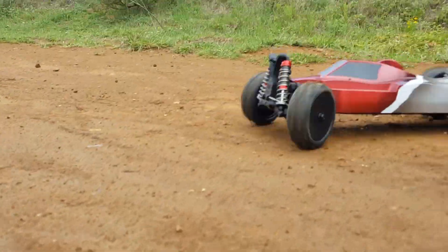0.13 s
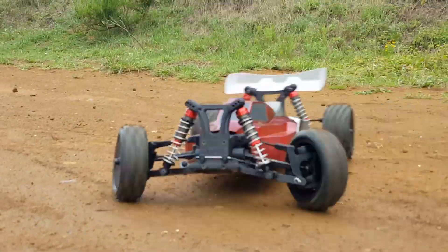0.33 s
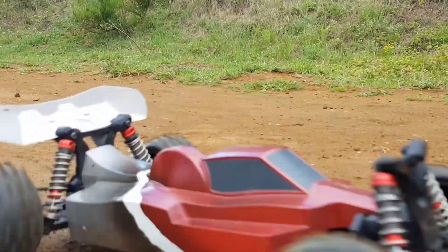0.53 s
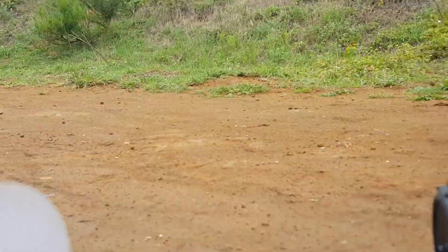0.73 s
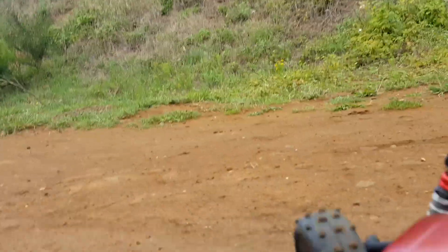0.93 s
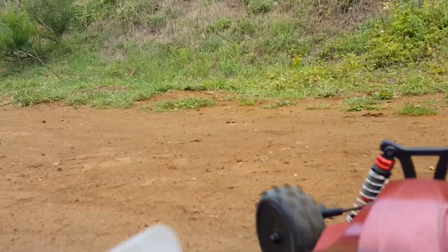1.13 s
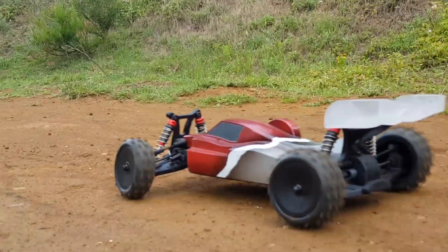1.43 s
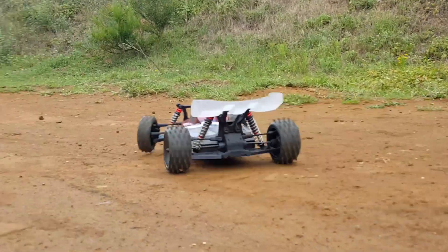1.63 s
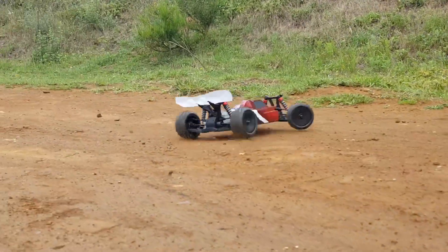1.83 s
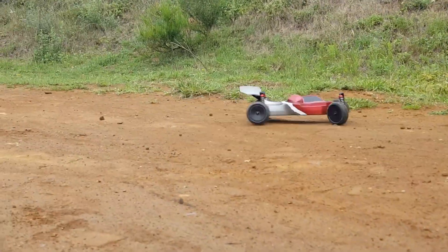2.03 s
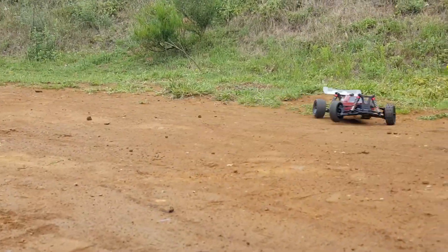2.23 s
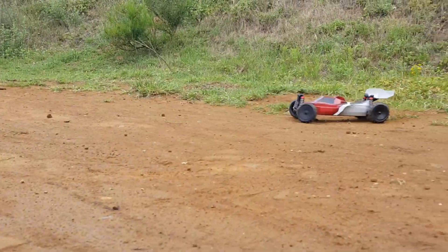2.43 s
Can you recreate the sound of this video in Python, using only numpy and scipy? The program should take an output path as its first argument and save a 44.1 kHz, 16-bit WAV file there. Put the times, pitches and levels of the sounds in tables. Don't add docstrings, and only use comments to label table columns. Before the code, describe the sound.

Outdoors on dirt, a toy buggy passes very close with rough gear whine, tyre hiss and ticking stones, halts with hard clacks, then pulls away buzzing and grows quieter over light wind rumble and faint hum.

```python
import sys
import numpy as np
from scipy import signal
from scipy.fft import rfft, irfft, next_fast_len
from scipy.io import wavfile
from scipy.ndimage import map_coordinates

SR = 44100
rng = np.random.default_rng(int(sys.argv[2]) if len(sys.argv) > 2 else 0)


def wav_out(sig):
    wavfile.write(sys.argv[1], SR, np.round(np.clip(np.atleast_2d(sig).T, -1, 1) * 32767).astype(np.int16))


def gain_from_decibels(decibels):
    exponent = np.asarray(decibels, float) / 20
    return 10 ** exponent


N = 114660


def unit(x):
    return x / np.sqrt(np.mean(np.abs(x) ** 2) + 1e-20)


def along(points, hz):
    f, v = np.transpose(points)
    return np.interp(np.log(hz + 1), np.log(f + 1), v)


def curves(rows):
    s, *columns = np.transpose(rows)
    return [np.interp(np.arange(N) / SR, s, column) for column in columns]


def wobble(rate):
    return map_coordinates(rng.standard_normal(N // 20), [np.arange(N) * rate / SR])


def noise(*ports):
    return rng.standard_normal((*ports, N))


def filtered(x, response):
    m = next_fast_len(N + 8192)
    return irfft(rfft(x, m) * response(np.fft.rfftfreq(m, 1 / SR)), m)[..., :N]


def between(start, end, edge_s):
    t = np.arange(N) / SR
    return np.clip((t - start) / edge_s, 0, 1) * np.clip((end - t) / edge_s, 0, 1)


def pings(rows, hz, gain_db, rise_s, t60, noisy):
    s, db = np.transpose(rows)[:2]
    t = np.arange(3000) / SR
    shape = (1 - np.exp(-t / rise_s)) * gain_from_decibels(-60 * t / t60)
    tone = np.sin(2 * np.pi * np.reshape(hz, (-1, 1)) * t)
    crack = noisy * rng.standard_normal((len(s), len(t)))
    wave = shape / shape.max() * (tone + crack) * gain_from_decibels(db + gain_db)[:, None]
    at = np.round(s * SR).astype(int)[:, None] + np.arange(len(t))
    return np.bincount(at.ravel(), wave.ravel(), N + SR)[:N]


def fuzzy(hz, width_hz):
    blur = wobble(width_hz) + 1j * wobble(width_hz)
    return unit(np.real(blur * np.exp(2j * np.pi * np.cumsum(hz) / SR)))


def tones(rows, edge_s, unsteady_db):
    t = np.arange(N) / SR
    total = 0
    for hz, db, start, end in rows:
        level = gain_from_decibels(db + 2.5 + unsteady_db * wobble(15.16))
        total = total + level * between(start, end, edge_s) * np.sin(2 * np.pi * hz * t)
    return total


def noise_floor():
    return gain_from_decibels(-55.5) * unit(filtered(noise(2), lambda f: 1 / (1 + (f / 450) ** 2)))


def far_hum():
    # (frequency [Hz], level [dB rms], start [s], end [s])
    hum_lines = [(90.5, -52, 1.3, 2.7), (181, -45, -.1, 2.32)]
    return tones(hum_lines, edge_s=0.083, unsteady_db=.5)


def wind():
    # (time [s], level [dB])
    strength = [(0, -40), (.15, -34.5), (.75, -34.5), (.95, -27), (1.1, -35), (1.3, -39.5), (1.8, -36),
                (2.6, -52)]
    # (frequency [Hz], density [dB per Hz])
    colour = [(15, -35), (30, -15), (60, 5), (100, -0.5), (150, -9.5), (300, -19), (700, -55.5)]
    wind_db, = curves(strength)
    return gain_from_decibels(wind_db) * unit(filtered(noise(2), lambda f: gain_from_decibels(along(colour, f))))


def ground_thumps():
    # (time [s], peak [dB], frequency [Hz], left over right [dB])
    bumps = [
        (0.072, -24, 62.6, 16),
        (0.857, -15, 67, 2),
        (0.917, -23, 87, 14),
        (0.983, -21, 67, 9),
        (1.453, -28, 56.3, 20),
        (1.677, -27, 57, 12),
        (1.782, -26, 57, 4),
        (1.948, -30.5, 89, 7),
    ]
    s, db, hz, pan_db = np.transpose(bumps)
    return np.array([pings(np.c_[s, db + side * pan_db], hz, 0, rise_s=0.0032, t60=0.12, noisy=0)
                     for side in (0, -1)])


def speed_controller():
    # (frequency [Hz], level [dB rms], start [s], end [s])
    whistles = [(5800, -66, .97, 1.07), (11600, -68, .99, 1.045), (7800, -70, .94, 1.0),
                (3750, -66, .93, 1.03)]
    return tones(whistles, edge_s=.015, unsteady_db=1.5)


def tyre_spray():
    # (time [s], level [dB])
    skid = [(0, -32), (.06, -51), (.18, -34.5), (.42, -37.5), (.55, -32), (.72, -32), (.8, -42.5),
            (.86, -37.5), (.95, -62), (1.033, -70), (1.041, -35.5), (1.07, -50), (1.13, -30.5), (1.27, -38),
            (1.5, -49.5), (1.62, -48), (1.79, -39.5), (1.98, -44), (2.06, -55), (2.12, -44.5), (2.27, -42),
            (2.6, -45)]
    # (frequency [Hz], density [dB per Hz])
    colour = [(1500, -28), (2500, 1), (3900, 6.5), (6000, 1.5), (8000, -7.5), (10000, -10), (12000, -5),
              (15500, -14.5)]
    spray_db, = curves(skid)
    fine = lambda f: f ** 4 / (f ** 4 + 5500 ** 4)
    hiss = noise() * gain_from_decibels(1.6 * wobble(300) + 2.4 * wobble(30))
    clumps_db = np.minimum(2.6 * wobble(22) + wobble(7), 3)
    grit = noise() * gain_from_decibels(1.5 * wobble(600) + 3.5 * wobble(120) + clumps_db)
    body = filtered(hiss, lambda f: gain_from_decibels(along(colour, f)) * (1 - fine(f)))
    treble = filtered(grit / np.std(grit), lambda f: gain_from_decibels(along(colour, f)) * fine(f))
    grains_per_s = 70
    draw = rng.random((round(grains_per_s * N / SR), 3))
    falls = np.c_[draw[:, 0] * N / SR, 10 * draw[:, 1] ** 2]
    grains = pings(falls, 0, -12.5, rise_s=.0004, t60=0.0046, noisy=0.92)
    return gain_from_decibels(spray_db) * (unit(body + treble) + filtered(grains, fine))


def stone_ticks():
    # (time [s], peak [dB])
    landings = [(.0243, -21), (.0772, -20.5), (.1905, -17.5), (.299, -40), (.336, -42), (.4015, -21),
                (.488, -19), (.5075, -8.5), (.539, -22), (.59, -24), (.7238, -9), (.7285, -11.5),
                (.7505, -24), (.7675, -45), (.8225, -18), (.8258, -14), (.8745, -31), (.9015, -46),
                (.9395, -40), (1.0045, -33), (1.047, -25), (1.2015, -32), (1.3115, -18), (1.413, -20.5),
                (1.709, -33), (1.826, -26), (1.885, -36), (1.957, -27), (2.09, -40), (2.151, -30),
                (2.2605, -26), (2.272, -25.5), (2.5785, -35), (.105, -38), (.854, -21), (1.038, -39),
                (1.218, -28), (1.7434, -35)]
    low_hz, high_hz = 1700, 14000
    ticks = np.array([pings(landings, 0, -4, rise_s=.0003, t60=.008, noisy=1) for port in "LR"])
    return filtered(ticks, lambda f: (1j * f / (low_hz + 1j * f)) ** 2 / (1 + 1j * f / high_hz))


def stone_chips():
    # (time [s], peak [dB], ring [Hz])
    strikes = [(0.8231, -4.5, 2720), (0.826, -1, 3140), (.855, -22, 11100), (1.219, -25.5, 11580),
               (1.253, -23, 7584), (1.559, -31, 13700), (1.12, -23.5, 7700), (1.201, -28, 8000),
               (1.708, -35, 10400), (1.8253, -12.5, 1566), (2.2593, -29.5, 6860), (0.824, -14, 4800)]
    return pings(strikes, np.array(strikes)[:, 2], 0, rise_s=0.000092, t60=0.0042, noisy=0)


def shell_rattle():
    # (time [s], level [dB])
    rolling = [(0, -30.5), (.06, -32.5), (.2, -23), (.38, -29.5), (.47, -26.5), (.55, -22.5), (.73, -20),
               (.8, -27), (.87, -21.5), (.94, -41), (.955, -44), (1.035, -44), (1.04, -28.5), (1.14, -20),
               (1.3, -29), (1.62, -36), (1.77, -33), (1.88, -34), (2.06, -36), (2.27, -34.5), (2.6, -36.5)]
    # (frequency [Hz], density [dB per Hz])
    colour = [(150, -16), (200, -14), (400, -8.5), (480, -3), (1200, -8), (2200, -9.5), (3000, -20.5),
              (6000, -36.5)]
    # (frequency [Hz], width [Hz], level [dB])
    modes = [(521, 67, -6), (673, 60, -13), (890, 256, -1.5)]
    level_db, = curves(rolling)
    jolts = noise() * gain_from_decibels(1.4 * (wobble(130) + 0.88 * wobble(29.73)))

    def ring(f):
        resonance = sum(gain_from_decibels(db) * w / (w + 2j * (f - centre)) for centre, w, db in modes)
        return gain_from_decibels(along(colour, f)) * (0.9 + resonance)

    return gain_from_decibels(level_db) * unit(filtered(jolts, ring))


def strain_buzz():
    # (time [s], buzz [Hz], level [dB])
    strain = [(1.04, 859, -35.5), (1.07, 951, -23.5), (1.1, 1176, -32), (1.3, 1141, -33),
              (1.55, 1169, -30.5), (1.58, 1250, -36.5), (1.68, 1600, -41)]
    hz, buzz_db = curves(strain)
    gate = between(1.037, 1.69, edge_s=0.0076)
    return gain_from_decibels(buzz_db + 2.3 * wobble(45.34)) * gate * fuzzy(hz, width_hz=230)


def chassis_knocks():
    # (time [s], peak [dB], ring [Hz])
    blows = [(0.188, -6, 728), (0.193, -11.5, 770), (0.506, -6, 710), (0.647, -7.5, 520), (0.72, -9, 543),
             (0.726, -1.5, 540), (0.736, -5.5, 740), (0.821, -12.5, 556), (0.844, -5.5, 528),
             (0.872, -11.5, 490), (0.881, -9.5, 550), (0.93, -15.5, 506), (0.99, -23, 1040),
             (1.093, -7, 1126), (1.122, -10.5, 533), (1.159, -11.5, 780), (1.399, -15, 993),
             (1.491, -35, 1231), (1.539, -14, 1170), (.836, -10.5, 690), (.914, -15.5, 527),
             (1.037, -17.5, 800), (1.71, -34, 517), (1.752, -22, 690), (1.772, -20.5, 480),
             (1.787, -23, 606), (1.965, -21.5, 554), (2.155, -21, 610), (2.168, -20.5, 540)]
    hz = np.array(blows)[:, 2]
    body = pings(blows, hz, -4.5, rise_s=0.0011, t60=0.022, noisy=0)
    overtone = pings(blows, 1.6 * hz, -11.0, rise_s=0.00032, t60=0.027, noisy=0)
    stop = pings([(.823, -22)], 170, 0, rise_s=0.0018, t60=0.083, noisy=0)
    return body + overtone + stop


def gear_bites():
    # (time [s], peak [dB], mesh [Hz])
    catches = [(.1785, -22, 1940), (.2119, -21, 1950), (.3846, -30, 1880), (0.399, -20, 1794),
               (.426, -15, 2085), (.4575, -16, 2003), (.4868, -17, 2074), (.5174, -18, 2070),
               (0.5444, -13, 1930), (.5687, -19, 2140), (.596, -12, 1995), (0.6219, -11.5, 2005),
               (.655, -23, 1960), (.6795, -32, 1970), (.6959, -20, 1970), (1.1199, -17.5, 1834),
               (1.1397, -22, 1888), (1.3771, -26, 1970), (1.3963, -27, 1870), (1.683, -29, 1770),
               (1.705, -27, 1715), (1.7489, -34, 1816), (1.762, -33, 1840), (1.7933, -29.5, 2110),
               (1.8426, -27, 1880), (1.8675, -33, 1800), (1.8975, -27.5, 1855), (1.913, -30, 1920),
               (1.9692, -29, 1970), (1.9977, -29, 1940), (2.0982, -28, 2002), (2.5539, -28.5, 2000),
               (2.579, -30, 2050)]
    mesh_hz = np.array(catches)[:, 2]
    bite = pings(catches, mesh_hz, 0, rise_s=0.0027, t60=0.03, noisy=0)
    return bite + pings(catches, 1.97 * mesh_hz, -17.5, rise_s=0.004, t60=0.03, noisy=0)


def pinion_squeals():
    # (time [s], peak [dB], chirp [Hz])
    chirps = [(1.585, -32.5, 3920), (1.629, -32.5, 4040), (1.743, -32, 4600), (1.769, -31.5, 4240),
              (1.801, -34, 4410), (.4, -31, 3650), (.424, -26, 3950), (.563, -31, 4260), (1.349, -31, 4000),
              (1.39, -36, 4620), (1.443, -35.5, 4006), (1.487, -37.5, 3950), (1.534, -35.5, 4290),
              (1.819, -33.5, 4680), (1.865, -41, 4150), (1.888, -40, 4110), (1.908, -43, 4300),
              (2.565, -36.5, 4210)]
    return pings(chirps, np.array(chirps)[:, 2], 0, rise_s=0.006, t60=0.039, noisy=0)


def gear_whine():
    # (time [s], tooth mesh [Hz], load [dB])
    drive = [(0, 1880, -53), (.1, 1450, -41), (.19, 1935, -28), (.3, 1845, -35), (.45, 2030, -28),
             (.62, 2044, -26), (.72, 1953, -40), (.9, 1895, -81), (1.0, 1871, -70), (1.13, 1910, -21),
             (1.25, 1842, -42), (1.4, 1960, -40.5), (1.6, 1855, -40.5), (1.7, 1733, -35),
             (1.9, 1916, -41.5), (2.1, 2000, -41), (2.35, 1800, -39.5), (2.6, 2046, -50.5)]
    # (multiple of the mesh pitch [ratio], level [dB])
    overtones = [(1, 1), (2.05, -11)]
    turns_per_s, turn_depth_db, mesh_width_hz = 36, 2.8, 330
    hz, load_db = curves(drive)
    turn = np.cos(2 * np.pi * np.cumsum(turns_per_s * (1 + 0.093 * wobble(27.24))) / SR)
    swell = gain_from_decibels(turn_depth_db * turn + 1.2 * wobble(25.8))
    mesh = 0
    for k, db in overtones:
        pitch = k * hz * (1 + .025 * wobble(18))
        mesh = mesh + gain_from_decibels(db + 0.9 * wobble(11.54)) * fuzzy(pitch, mesh_width_hz * k)
    return gain_from_decibels(load_db) * unit(swell * mesh)


def ports(steady, sharp):
    # (frequency [Hz], likeness [0 to 1])
    alike = [(250, 1), (500, 0.98), (1000, 0.98), (2000, 0.51), (4000, 0.096), (15000, 0.13)]
    # (frequency [Hz], left over right [dB])
    tilt = [(300, 1.5), (2500, 2), (5000, 0), (7800, -14.5), (11000, -5.5), (15000, 0.5)]
    lag_s = 1e-4
    z = signal.stft(steady, nperseg=256)[2]
    random_phase = np.exp(2j * np.pi * rng.random(z.shape))
    apart = signal.istft(z * random_phase, nperseg=256)[1][:N]
    apart = apart * np.std(steady) / np.std(apart)

    def spread(f):
        angle = np.arccos(np.clip(along(alike, f), 0, 1)) / 2
        return np.array([np.cos(angle), np.sin(angle)]) / (1 + (f / 15800) ** 500)

    mid, side = filtered(np.array([steady, apart]), spread)
    sign = np.array([[1], [-1]])

    def port(f):
        return gain_from_decibels(sign * along(tilt, f) / 2) * np.exp(-1j * np.pi * sign * f * lag_s)

    return filtered(mid + sign * side + sharp, port)


def scene():
    background = noise_floor() + far_hum() + wind() + ground_thumps()
    steady = speed_controller() + tyre_spray() + shell_rattle() + strain_buzz()
    steady = steady + pinion_squeals() + gear_whine()
    sharp = stone_ticks() + stone_chips() + chassis_knocks() + gear_bites()
    return background + ports(steady, sharp)


def band_limit(x):
    return signal.sosfilt(signal.butter(12, 16990, fs=SR, output="sos"), x)


def record(dry):
    finished = filtered(dry, lambda f: 1 / (1 + (f / 16000) ** 100))
    return band_limit(finished)


dry = scene()
out = record(dry)
wav_out(out)
```